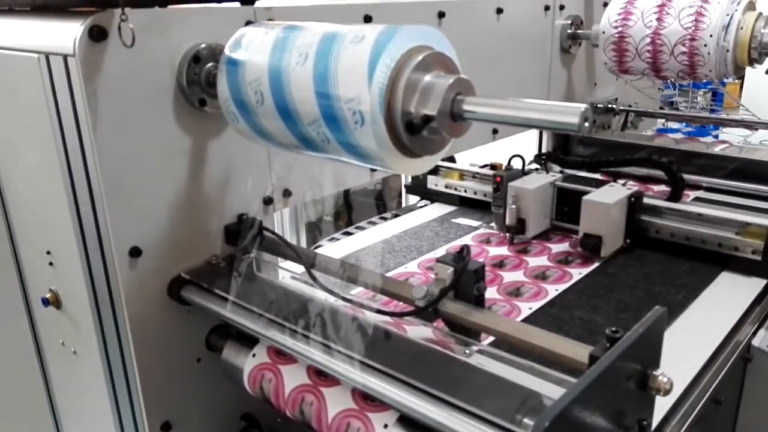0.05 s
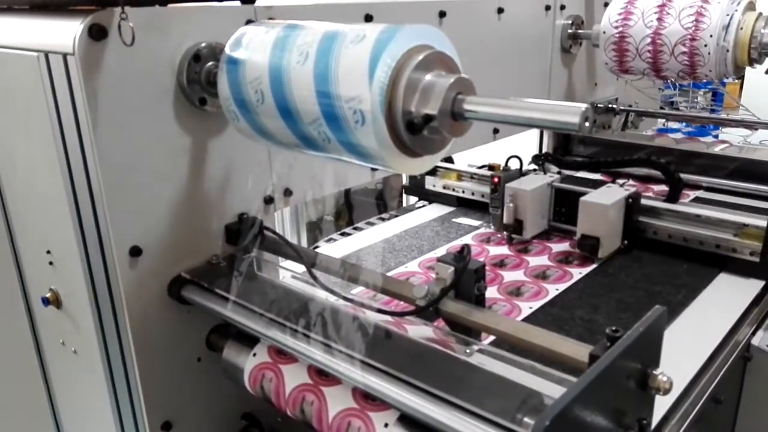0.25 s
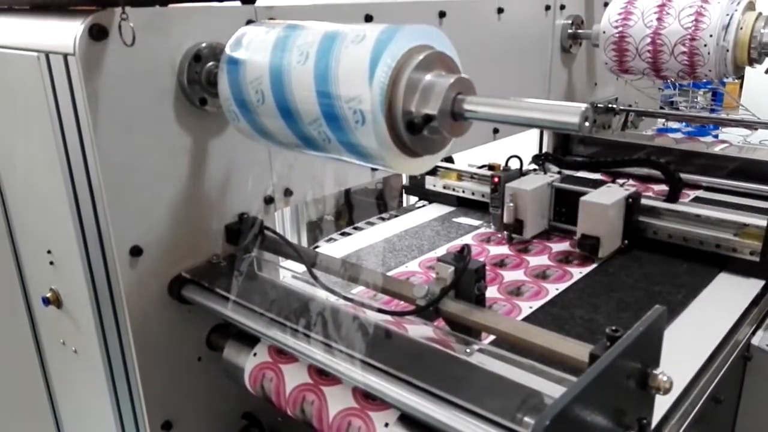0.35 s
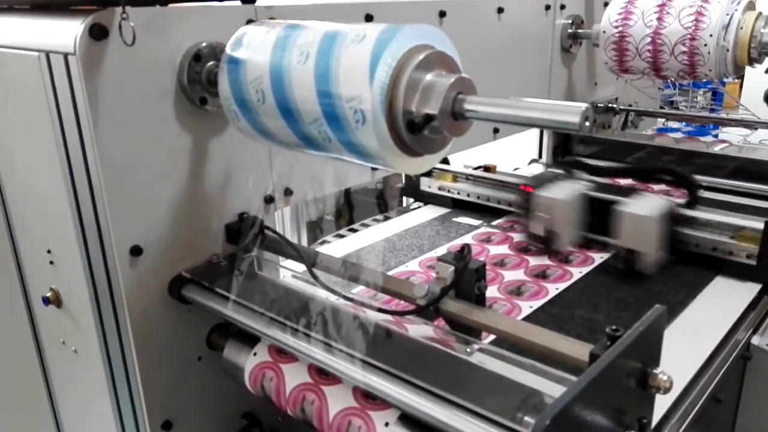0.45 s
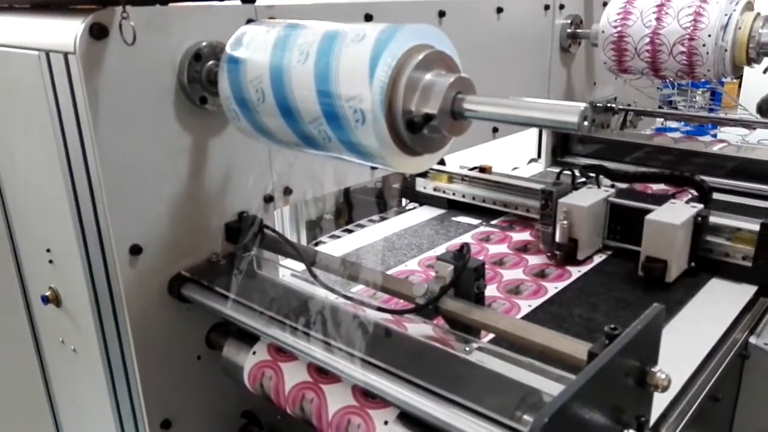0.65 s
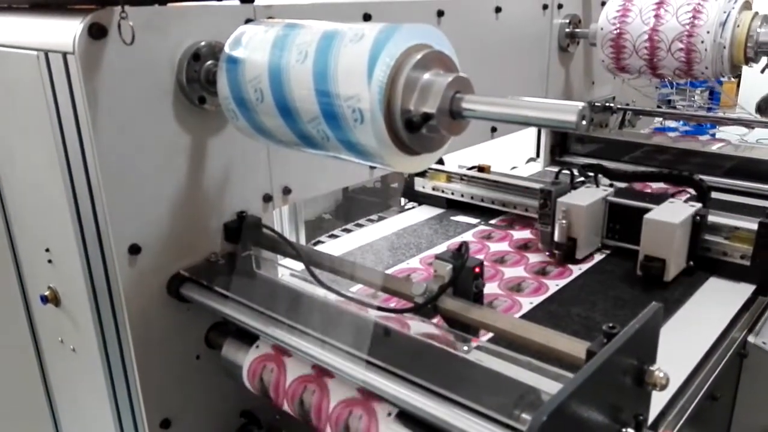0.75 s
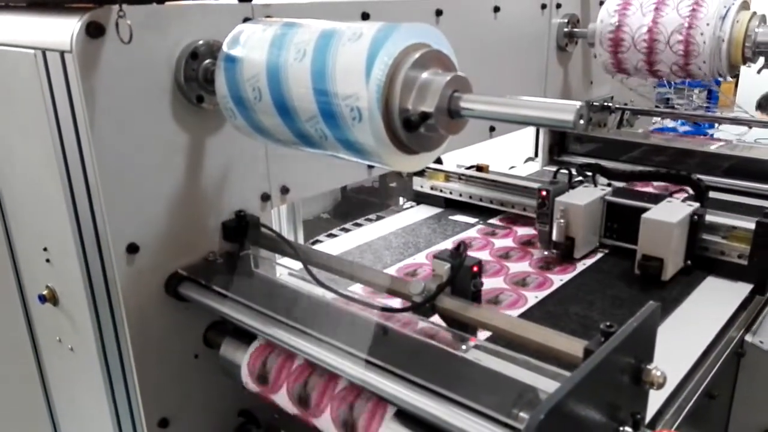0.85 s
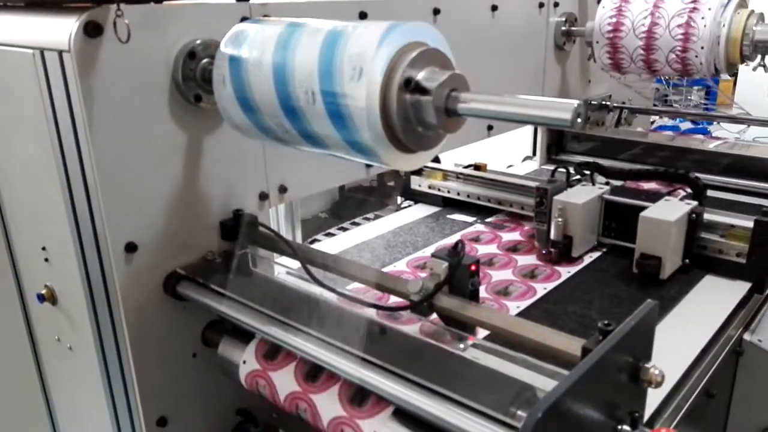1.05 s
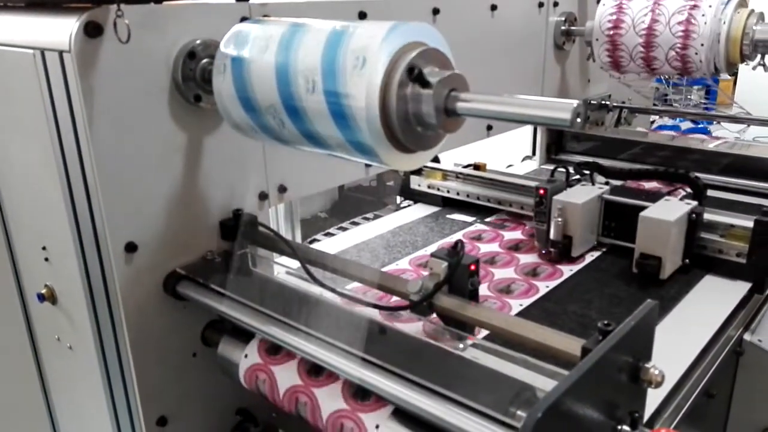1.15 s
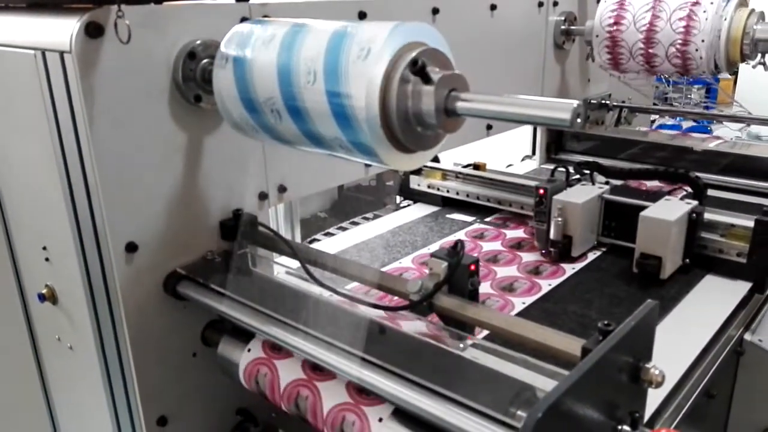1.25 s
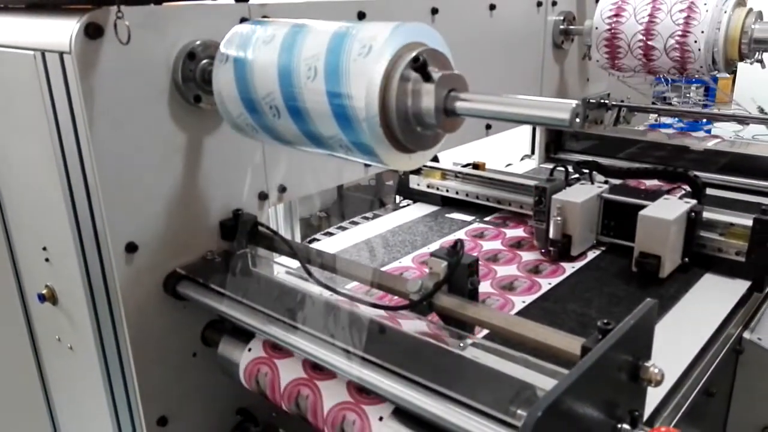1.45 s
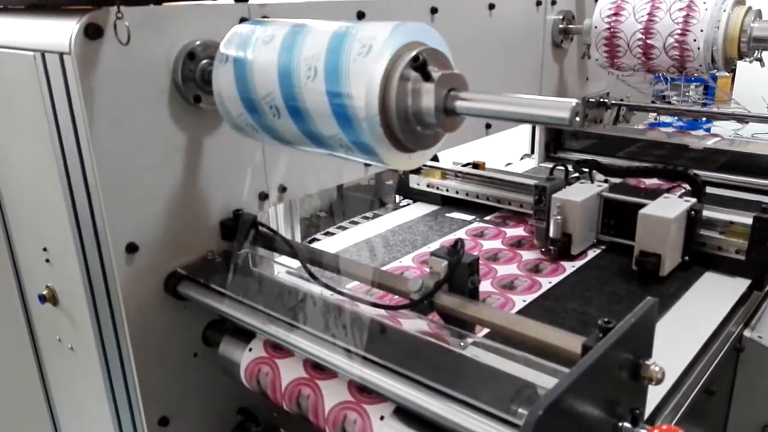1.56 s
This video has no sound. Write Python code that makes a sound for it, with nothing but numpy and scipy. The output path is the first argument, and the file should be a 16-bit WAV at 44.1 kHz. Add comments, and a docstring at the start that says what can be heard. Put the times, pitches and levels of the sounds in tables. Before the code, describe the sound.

A label-cutting machine clacks, slides its heads and peels crackling film over a motor hum.

```python
"""Label cutter at work

Close up in a hard-walled workshop, the knife lifts with a double clack and the cutting heads roll
back along their rail. The web advances: sticky film peels from its roll in two crackling pulls as
the glue grips and lets go. Motor hum and air hiss fall away, and the machine settles to idle."""
import sys
import numpy as np
from scipy import signal
from scipy.fft import rfft, irfft
from scipy.io import wavfile

SR = 44100
rng = np.random.default_rng(int(sys.argv[2]) if len(sys.argv) > 2 else 0)


def wrap_up_sound(samples):
    """Save the sound to the file named by the first command line argument, as 16-bit audio."""
    columns = np.atleast_2d(samples).T
    # keep every value between -1 and 1, then stretch to whole-number steps
    tamed = np.clip(columns, -1, 1)
    steps = np.round(tamed * 32767).astype(np.int16)
    wavfile.write(sys.argv[1], SR, steps)


N = 70560
TIME = np.arange(N) / SR

# Film snapping free of the roll: start_s, relative_db
FILM_SNAPS = [(0.6716, -12), (0.6743, -15), (0.6802, -15), (0.6868, -18), (0.6949, -18), (0.7009, -16),
              (0.7054, -18), (0.7091, -18), (0.7142, -19), (0.7156, -20), (0.7187, -19), (0.7377, -23),
              (0.75, -15.5), (0.7575, -16), (0.7626, -18), (0.7681, -22), (1.1101, -23), (1.1175, -23.5),
              (1.1251, -22.5), (1.1326, -20), (1.1403, -26), (1.1492, -26), (1.1569, -23), (1.1639, -23),
              (1.1708, -23), (1.1731, -26), (1.181, -25), (1.1894, -26), (1.1974, -26), (1.2044, -24),
              (1.2124, -22), (1.2139, -19.5), (1.2156, -23), (1.2271, -28), (1.2357, -26), (1.2491, -27),
              (1.2558, -22), (1.2582, -21), (1.2669, -23), (1.2683, -23)]
# Unbroken tearing under and after the snaps: time_s, level_db
TEAR_CURVE = [(.668, -44), (.676, -29), (.712, -20.5), (.728, -28), (.746, -45.5), (.758, -20.5),
              (.778, -24), (.806, -19), (.83, -18.5), (.855, -18), (.872, -22), (.898, -20), (.918, -38),
              (.94, -72), (1.11, -68), (1.135, -36), (1.175, -30.5), (1.21, -30), (1.24, -31.5),
              (1.268, -41.5), (1.285, -80)]
# Bright tone of the film: freq_hz, gain_db
FILM_EQ = [(30, -19), (250, -15), (700, -13.5), (1400, -11), (2000, -6), (2700, -5), (4600, -2.5),
           (5200, -5), (5800, 0), (6400, -2), (7700, 1), (8400, -0.5), (9500, 2.5), (11000, 0.5),
           (12400, 2.5), (13300, 3), (14500, 2)]
# Placement of the film and the knocks: freq_hz, left_minus_right_db
WEB_PAN = [(500, 2.5), (1300, 2.5), (3200, 19.5), (4800, 1), (7200, 9.5), (9000, 8), (11000, -5),
           (13000, -2.5), (14200, -1)]

# Clicks of the knife lift: start_s, level_db, decay_s
KNIFE_CLICKS = [(.2184, -14.5, 0.0021), (.2222, -27, 0.0017), (.2346, -19.5, 0.0032), (.241, -28, 0.0011)]
# Crisp tone of the clicks: freq_hz, gain_db
CLICK_EQ = [(300, -12.5), (2000, -15.5), (3100, -13), (3800, -37.5), (4400, -5.5), (5400, -1), (7600, -2),
            (8800, -12.5), (11000, -3.5), (14500, -6)]
# Placement of the clicks: freq_hz, left_minus_right_db
CLICK_PAN = [(2000, 2), (7500, 8.5), (11000, -2.5)]
# The knife holder hitting its stop: start_s, level_db, decay_s
HOLDER_HITS = [(.2368, -17, 0.00096)]
# Ring of the holder: pitch_hz, gain_db, t60_s
HOLDER_MODES = [(703, 2, 0.028), (1009, 7.5, 0.02), (1640, -9.5, 0.018), (2230, -3.5, 0.022),
                (2850, 9.5, 0.011)]
# Tick of a small steel latch: start_s, level_db, decay_s
LATCH_HITS = [(.1335, -40, 0.009)]
# Ring of the latch: pitch_hz, gain_db, t60_s
LATCH_MODES = [(8350, 0, .005), (9300, -3, .0015)]

# Knocks of the carriage and rollers: start_s, level_db, decay_s
ROLLER_KNOCKS = [(.228, -41, 0.0043), (.2385, -35, 0.0034), (.471, -36.5, 0.0085), (.7498, -31.5, 0.0015),
                 (.8672, -35, 0.0012), (.8711, -29.5, 0.0025), (.8754, -32, 0.0013), (.879, -29, 0.0071),
                 (.8907, -27, 0.0069), (.8962, -33.5, 0.0055), (1.14, -36.5, 0.0045), (1.2565, -37, 0.0033)]
# Midrange body of the knocks: freq_hz, gain_db
KNOCK_EQ = [(60, -25.5), (160, -17.5), (290, 2.5), (500, -3), (850, 3.5), (1050, 5), (1600, 3.5),
            (2800, 2.5), (4200, -41), (14000, -49)]
# Thuds of the cutting bed as knife and web stop: start_s, level_db, decay_s
BED_THUDS = [(.245, -41, .04), (.876, -38, .025), (1.255, -48, .03)]
# Boxy tone of the bed: freq_hz, gain_db
BED_EQ = [(90, -24.5), (190, -1), (310, -2), (700, -29.5), (3000, -80)]
# Tugs of the web on the frame: start_s, level_db, decay_s
WEB_TUGS = [(.002, -53.5, 0.15), (.672, -45, 0.024), (.748, -40, 0.0089)]
# Low weight of the tugs: freq_hz, gain_db
TUG_EQ = [(20, -11), (50, -1), (75, -1), (140, -4), (300, -29), (1000, -36), (8000, -84)]

# Swell of the heads rolling on their rail: time_s, level_db
RAIL_CURVE = [(.34, -51), (.39, -42), (.42, -35), (.475, -32), (.505, -41.5), (.55, -43), (.6, -60.5)]
# Tone of the rail: freq_hz, gain_db
RAIL_EQ = [(60, -21.5), (200, 2.5), (470, 0), (600, 9), (740, 8), (1050, -1.5), (1600, 1.5), (2600, -4),
           (4000, -9), (7000, -9), (14000, -13.5)]
# Whirr of the drives and belts: time_s, level_db
DRIVE_CURVE = [(0, -42), (.2, -47.5), (.26, -42.5), (.36, -42.5), (.48, -41), (.64, -41), (.76, -45.5),
               (.92, -50.5), (1.1, -51), (1.6, -62.5)]
# Tone of the whirr: freq_hz, gain_db
DRIVE_EQ = [(20, -14), (50, -11), (75, -9.5), (130, -6.5), (220, 1.5), (400, -3), (650, -4.5),
            (1200, -10.5), (2100, -9), (4000, -15.5), (14000, -53)]
# Carriage motor rumble, its pitch rising with speed: time_s, pitch_hz, level_db
MOTOR_CURVE = [(.02, 135.8, -44), (.1, 133.6, -70), (0.252, 171.3, -50), (.37, 181, -60),
               (0.452, 198.4, -44), (.63, 219.7, -46), (0.701, 170, -46.5), (.8, 130.2, -78)]
# Hum of the working drives: pitch_hz, level_db
WORK_TONES = [(100, -58.5), (133.5, -53.5), (174, -57), (199, -55), (344, -55), (447, -56)]

# Air hiss, stronger while the knife is held up: time_s, level_db
AIR_CURVE = [(0, -47), (.2, -48), (.25, -44), (.66, -43), (.8, -80)]
# Tone of the hiss: freq_hz, gain_db
AIR_EQ = [(500, -6), (2500, 1), (14000, 0)]
# Tone of the fans: freq_hz, gain_db
FAN_EQ = [(20, -9), (70, -21), (110, 5), (200, -1), (400, 1), (580, -12.5), (900, -3.5), (1400, -22),
          (7000, -29)]
# Hum of the resting machine: pitch_hz, level_db
IDLE_TONES = [(226, -66.5), (344.5, -64), (468, -65.5)]

# Reverb time of the workshop: freq_hz, t60_s
ROOM_DECAY = [(100, 1), (500, 0.83), (2200, 1), (5000, 0.66), (9000, 0.44), (14000, 0.44)]
# Balance of sound from all around: freq_hz, left_minus_right_db
ROOM_PAN = [(300, -3.5), (2000, 1), (4500, -1), (7500, 0.5), (9000, -8), (10500, -16), (14000, -19)]
# Likeness of left and right, narrow in the lows and wide in the highs: freq_hz, correlation
STEREO_LIKENESS = [(30, 0.62), (130, 0.96), (280, 0.94), (550, 0.61), (1100, 0.14), (4000, 0.077)]

EARLY_DB, EARLY_DECAY_S = 7, .01  # early reflections, relative to the reverb tail


def film(grains_per_s=28000, spread_db=3, snap_boost_db=2.5):
    """Stick and slip: single snaps at low speed merge into a dense tearing hiss at high speed."""
    grains = noise() * amp(spread_db * np.minimum(rng.exponential(1, N), 3))
    grains *= rng.random(N) < grains_per_s / SR
    peel = unit(grains) * level(TEAR_CURVE, outside_db=-np.inf)
    rise_s = .0004
    for start_s, db in FILM_SNAPS:
        add(peel, start_s - rise_s / 2, amp(db + snap_boost_db) * snap(rise_s))
    return placed(peel, FILM_EQ, WEB_PAN, wet_db=-5)


def snap(rise_s, decay_s=.00024, scatter_s=.0012, size=512):
    """One sharp release of the glue, scattered by the roll and nearby plates."""
    far_delay_s, far_db = .00051, -21.5  # the right microphone faces away from the roll
    t = TIME[:size] - rise_s - np.array([[0], [far_delay_s]])
    attack = np.clip(1 + t / rise_s, 0, 1)
    direct = amp([[0], [far_db]]) * np.exp(-abs(t) / decay_s)
    scattered = amp(-2) * np.exp(-abs(t) / scatter_s)
    burst = attack * (direct + scattered) * rng.standard_normal((2, size))
    return burst / np.linalg.norm(burst, axis=1, keepdims=True) * np.sqrt(.002 * SR)  # 2 ms at rms 1


def knife():
    """A latch ticks, the lift clicks and the holder rings against its stop."""
    metal = ring(blows(HOLDER_HITS), HOLDER_MODES) + ring(blows(LATCH_HITS), LATCH_MODES)
    clicks = placed(blows(KNIFE_CLICKS, punch_db=5.5), CLICK_EQ, CLICK_PAN, wet_db=-5, early_db=0)
    return metal + room(metal, wet_db=0) + clicks


def rollers():
    """Hard, short knocks from the rollers and the carriage."""
    return placed(blows(ROLLER_KNOCKS, punch_db=23), KNOCK_EQ, WEB_PAN, wet_db=-2)


def frame():
    """Dull low end: the cutting bed thuds and the web tugs on the frame."""
    return colour(blows(BED_THUDS), BED_EQ) + colour(blows(WEB_TUGS), TUG_EQ)


def carriage():
    """Bearings roll along the rail, louder with speed, over the whirr of the drives."""
    travel = noise() * level(RAIL_CURVE, outside_db=-np.inf)
    rolling = placed(travel, RAIL_EQ, ROOM_PAN, wet_db=-6.5)
    whirr = colour(noise(), DRIVE_EQ, ROOM_PAN) * level(DRIVE_CURVE)
    return rolling + whirr


def motor(hum_end_s=.9, hum_fade_s=.21):
    """The carriage motor's rumble glides with its speed; the drive hum fades as the heads come to rest."""
    time_s, hz, db = np.transpose(MOTOR_CURVE)
    rumble = rough_tone(np.interp(TIME, time_s, hz), width_hz=28, roughness=1.1)
    rumble *= amp(np.interp(TIME, time_s, db))
    fade = np.clip((hum_end_s - TIME) / hum_fade_s, 0, 1)
    return rumble + hum(WORK_TONES) * fade


def air():
    """Soft hiss of the pneumatics, heard from all around."""
    return colour(noise(), AIR_EQ, ROOM_PAN) * level(AIR_CURVE)


def idle(fan_db=-55.5):
    """A steady bed of fan noise and machine hum."""
    return amp(fan_db) * colour(noise(), FAN_EQ) + hum(IDLE_TONES)


def room(x, wet_db, early_db=EARLY_DB, crossfade_hz=4.995, count=3):
    """Workshop reverb, crossfading between several tails so the wash stays smooth and does not ring."""
    wet = np.zeros((2, N))
    for k in range(count):
        share = np.cos(np.pi * (crossfade_hz * TIME + k / count)) * np.sqrt(2 / count)
        wet += signal.fftconvolve(x * share, room_tail(early_db), axes=1)[:, :N]
    return amp(wet_db) * wet


def room_tail(early_db):
    """Impulse response: quick reflections off the machine's panels, then the wash of the workshop."""
    wash = colour(noise(), [(0, 0), (SR, 0)], ROOM_PAN)[:, :SR]
    hz, t, spectrum = signal.stft(wash, SR, nperseg=256)
    late = amp(-60 * t / at_hz(ROOM_DECAY, hz)[:, None])
    early = amp(early_db) * np.exp(-t / EARLY_DECAY_S)
    echo = signal.istft(spectrum * (late + early), SR)[1]
    echo[:, :SR // 400] = 0  # 2.5 ms pre-delay
    return echo * np.sqrt(2) / np.linalg.norm(echo)


def blows(hits, punch_db=-np.inf):
    """Each blow is a dying rattle; punch adds a leading spike where the parts meet squarely."""
    track = np.zeros((2, N))
    for start_s, db, decay_s in hits:
        rattle = np.exp(-TIME / decay_s) * noise()
        rattle[0, 0] += amp(punch_db)
        add(track, start_s, amp(db) * rattle)
    return track


def ring(x, modes):
    """Passes blows through the dying modes of a metal part."""
    t = TIME[:SR // 4]
    body = sum(amp(db - 60 * t / t60) * np.sin(2 * np.pi * hz * t) for hz, db, t60 in modes)
    return signal.fftconvolve(x, body[None] / np.linalg.norm(body), axes=1)[:, :N]


def hum(tones):
    """Slightly wavering tones of steady pitch."""
    return sum(amp(db) * rough_tone(hz, width_hz=7, roughness=.4) for hz, db in tones)


def rough_tone(hz, width_hz, roughness):
    """A tone of rms 1 whose strength and phase wander at random."""
    swell, drift = signal.sosfilt(signal.butter(2, width_hz, fs=SR, output="sos"), noise())
    phase = 2 * np.pi * (np.cumsum(hz * np.ones(N)) / SR + rng.random())
    return unit(np.sin(phase) * (1 + roughness * unit(swell)) + np.cos(phase) * roughness * unit(drift))


def placed(x, eq, pan, wet_db, early_db=EARLY_DB):
    """An equalised, panned source plus its reverb, sent before the pan."""
    return colour(x, eq, pan) + room(colour(x, eq), wet_db, early_db)


def colour(x, eq, pan=None, size=4096):
    """Unit-power EQ and pan by frequency, with the bass drawn towards mono."""
    hz = abs(np.fft.fftfreq(size, 1 / SR))
    pan_db = at_hz(pan, hz) if pan else np.zeros(size)
    sides = amp(np.array([[.5], [-.5]]) * pan_db)
    gain = unit(amp(at_hz(eq, hz)) * sides / np.sqrt(np.mean(sides ** 2, 0)))
    minimum_phase = np.exp(signal.hilbert(np.log(gain)).conj())  # no ringing ahead of a hit
    taps = np.fft.ifft(minimum_phase).real[:, :size // 2]
    left, right = rfft(x)
    likeness = np.clip(at_hz(STEREO_LIKENESS, np.fft.rfftfreq(N, 1 / SR)), -1, 1)
    right = likeness * left + np.sqrt(1 - likeness ** 2) * right
    pair = irfft(np.array([left, right]), N)
    return signal.fftconvolve(pair, taps, axes=1)[:, :N]


def at_hz(points, hz):
    """Reads a curve on a log-frequency axis."""
    freq_hz, value = np.transpose(points)
    return np.interp(np.log(hz + 1), np.log(freq_hz + 1), value)


def level(curve, outside_db=None):
    """A fader move as gain per sample; the end levels hold unless outside_db is given."""
    return amp(np.interp(TIME, *np.transpose(curve), left=outside_db, right=outside_db))


def add(mix, start_s, sound):
    """Drops a stereo sound into the mix."""
    part = mix[:, max(round(start_s * SR), 0):][:, :sound.shape[1]]
    part += sound[:, :part.shape[1]]


def noise():
    """Stereo white noise."""
    return rng.standard_normal((2, N))


def amp(db):
    """Decibels to gain."""
    return 10 ** (np.asarray(db) / 20)


def unit(x):
    """Scales to rms 1."""
    return x / np.sqrt(np.mean(x ** 2) + 1e-20)


def scene():
    """Film and mechanics up front; motor, air and fans behind."""
    return film() + knife() + rollers() + frame() + carriage() + motor() + air() + idle()


def record(dry):
    """The microphone's treble roll-off, then the band limit."""
    rolloff_hz, limit_hz = 14330, 16470
    rolloff = signal.firwin(201, rolloff_hz, window=("kaiser", 3), fs=SR)
    limit = signal.firwin(511, limit_hz, window=("kaiser", 9), fs=SR)
    return signal.oaconvolve(dry, np.convolve(rolloff, limit)[None], "same", axes=1)


dry = scene()
out = record(dry)
wrap_up_sound(out)
```